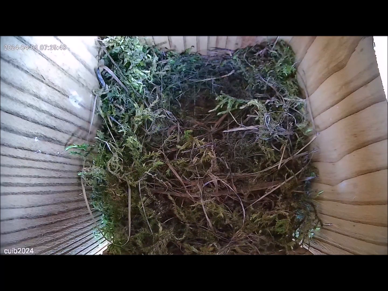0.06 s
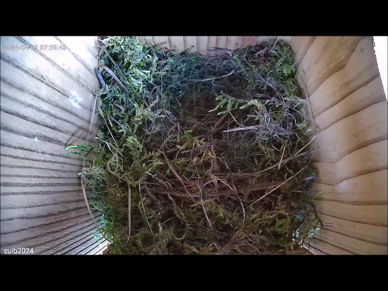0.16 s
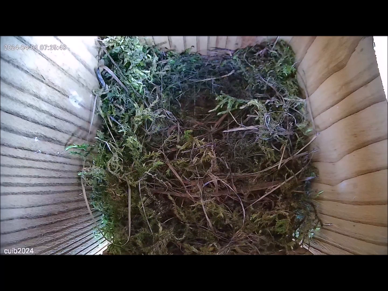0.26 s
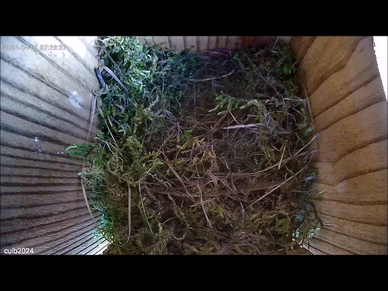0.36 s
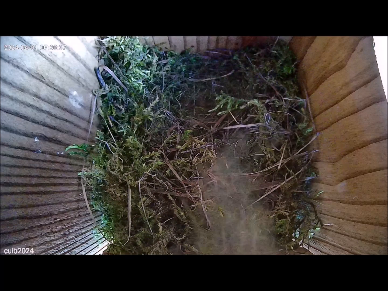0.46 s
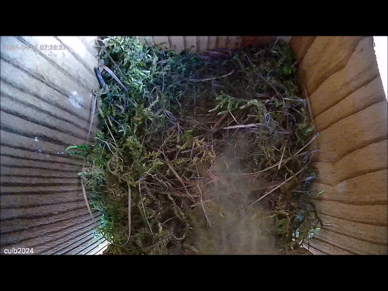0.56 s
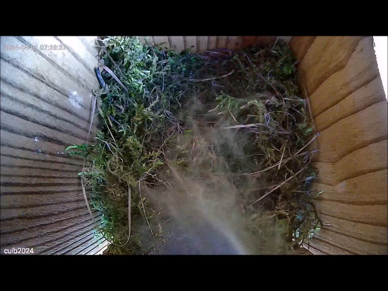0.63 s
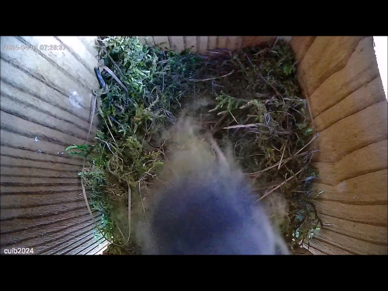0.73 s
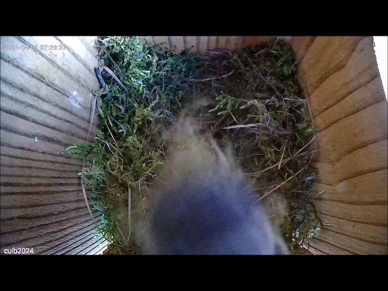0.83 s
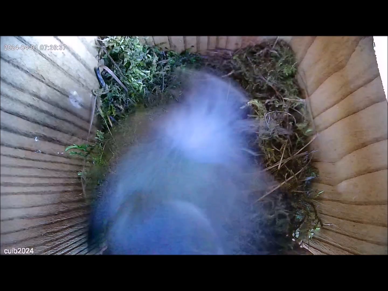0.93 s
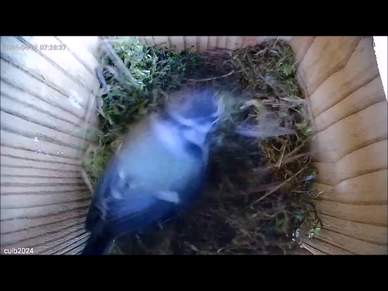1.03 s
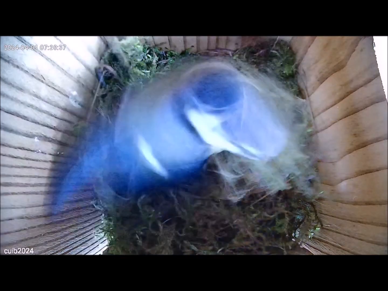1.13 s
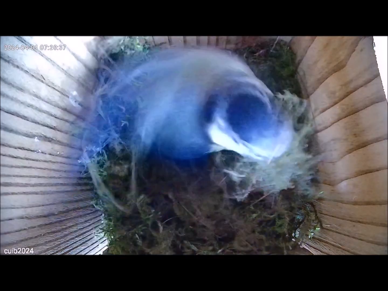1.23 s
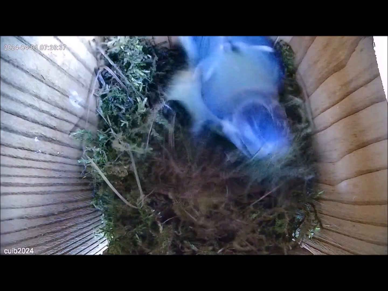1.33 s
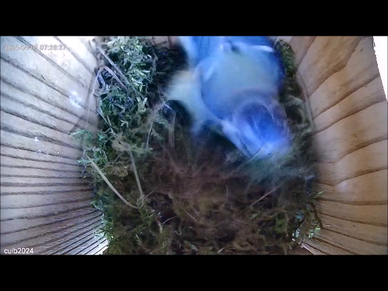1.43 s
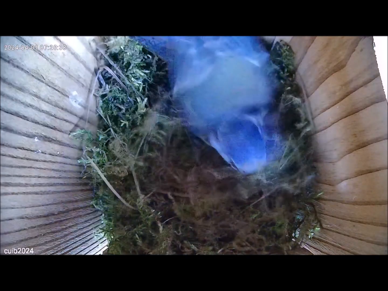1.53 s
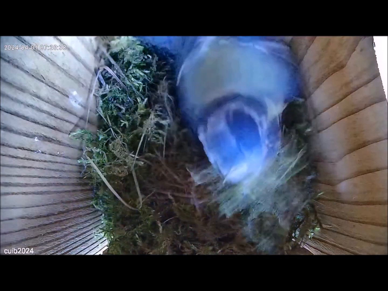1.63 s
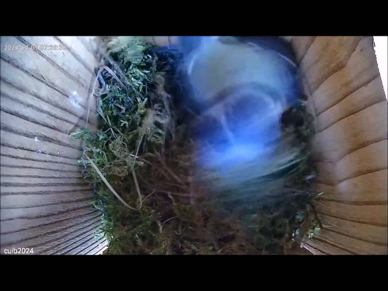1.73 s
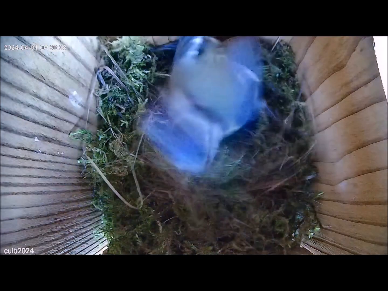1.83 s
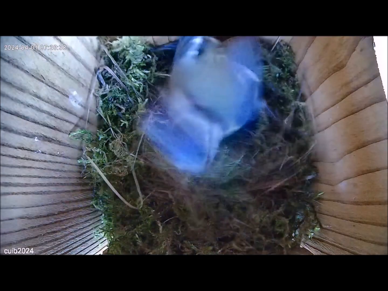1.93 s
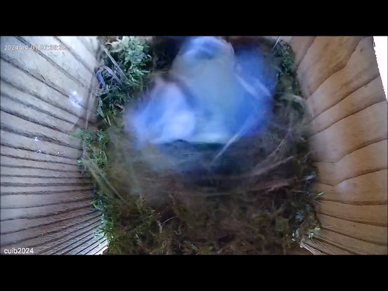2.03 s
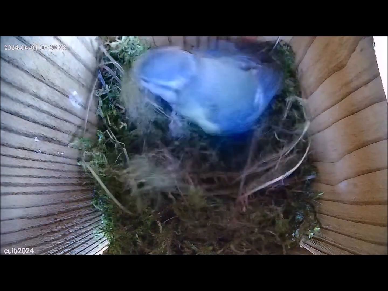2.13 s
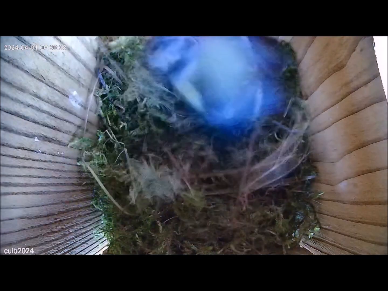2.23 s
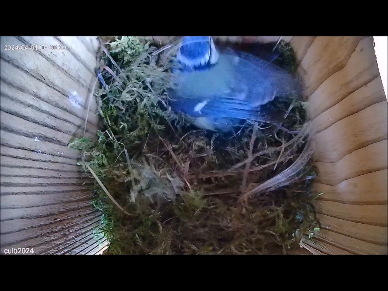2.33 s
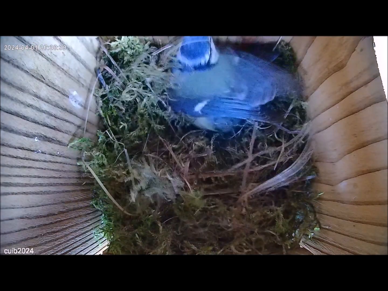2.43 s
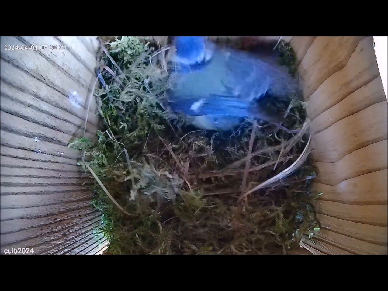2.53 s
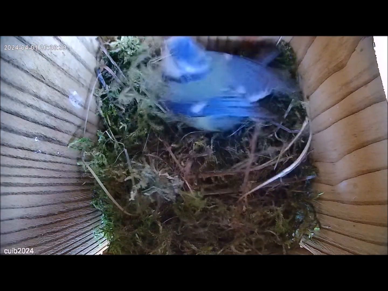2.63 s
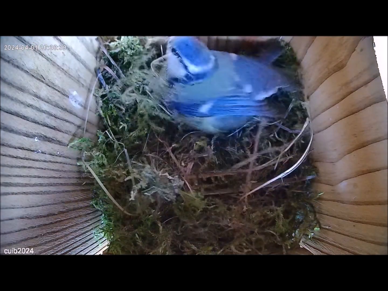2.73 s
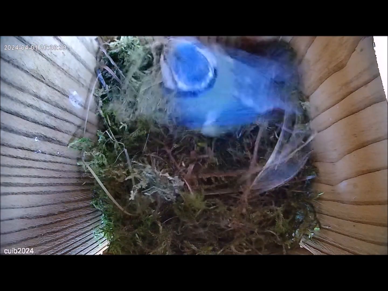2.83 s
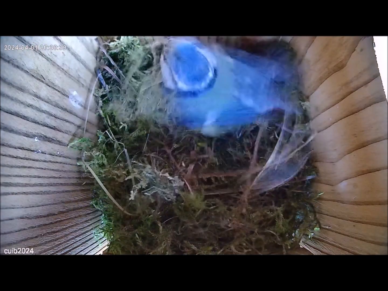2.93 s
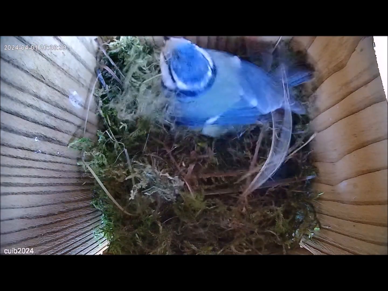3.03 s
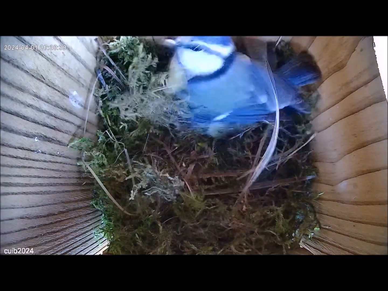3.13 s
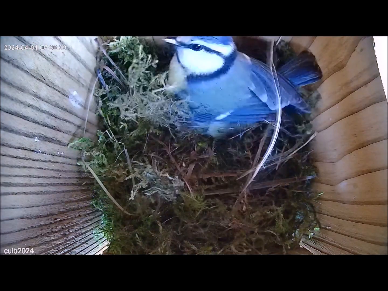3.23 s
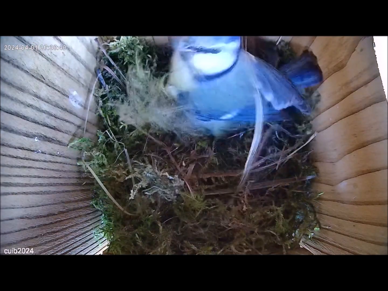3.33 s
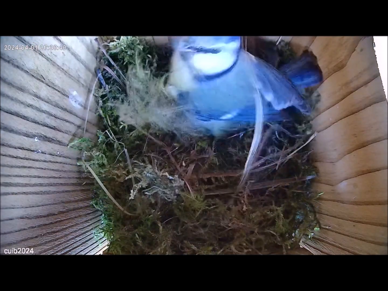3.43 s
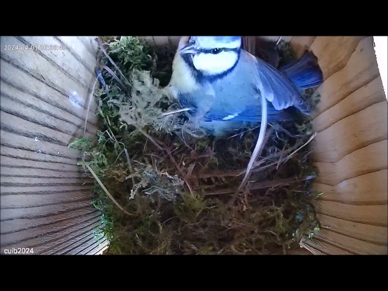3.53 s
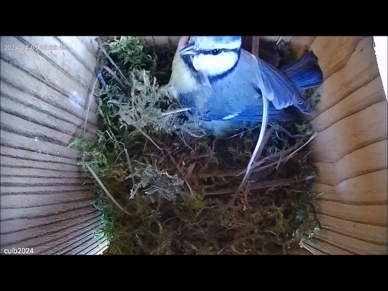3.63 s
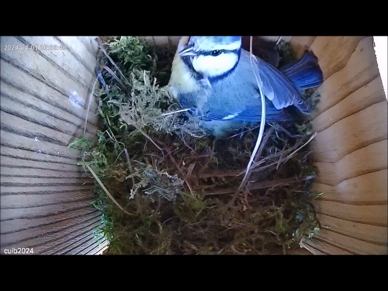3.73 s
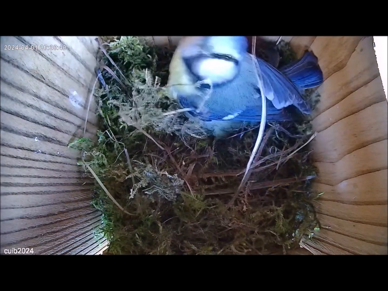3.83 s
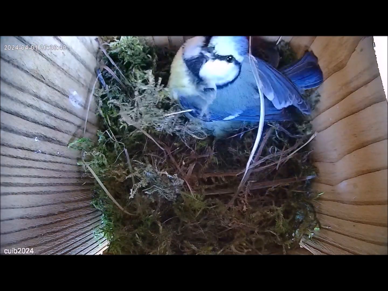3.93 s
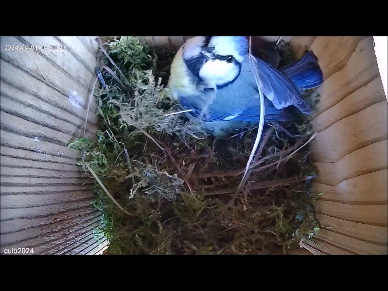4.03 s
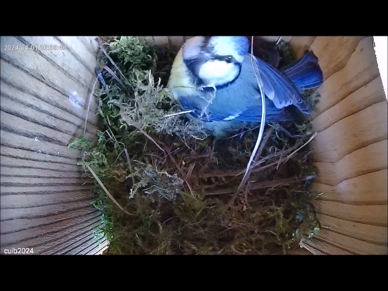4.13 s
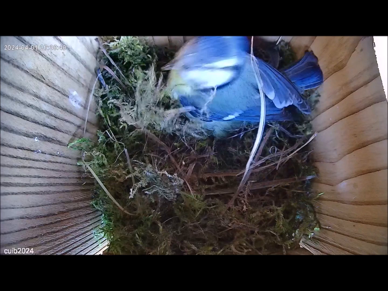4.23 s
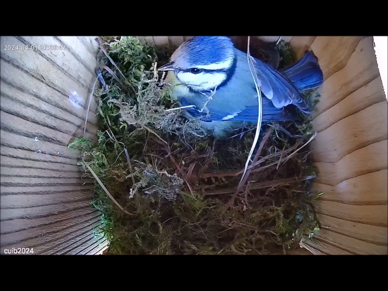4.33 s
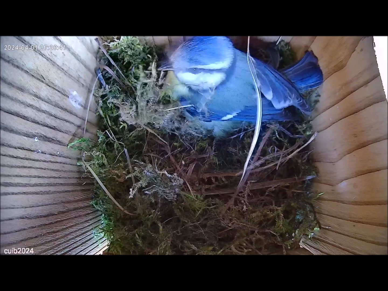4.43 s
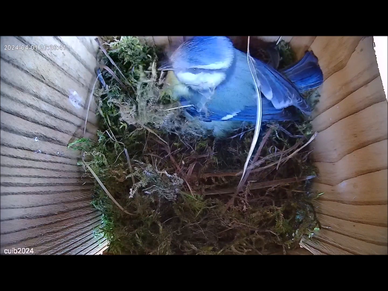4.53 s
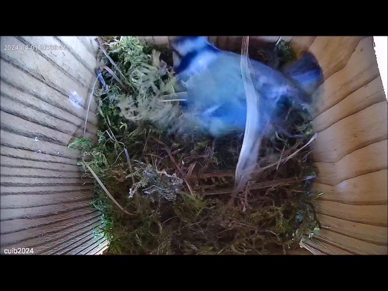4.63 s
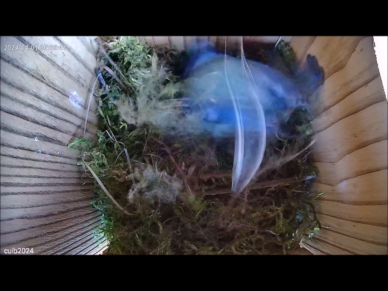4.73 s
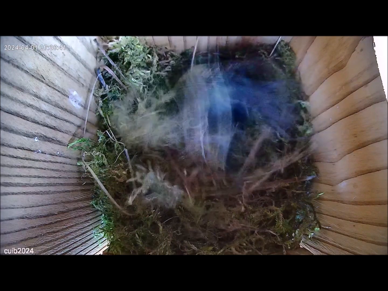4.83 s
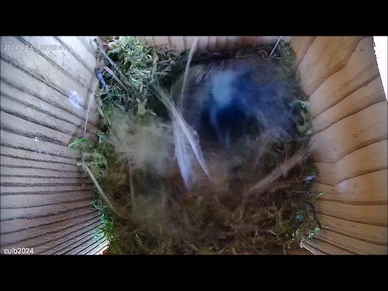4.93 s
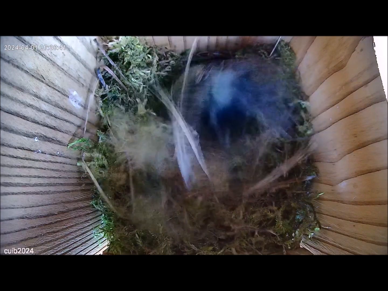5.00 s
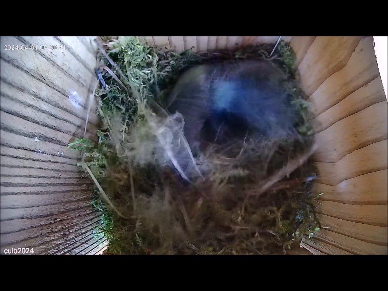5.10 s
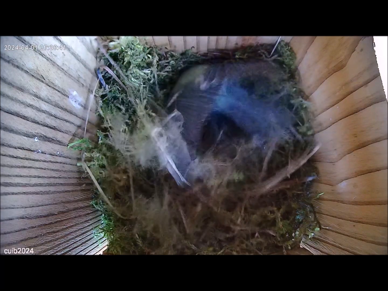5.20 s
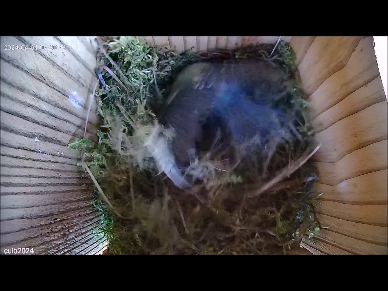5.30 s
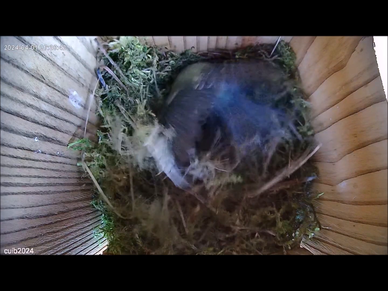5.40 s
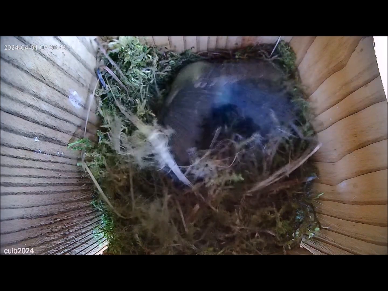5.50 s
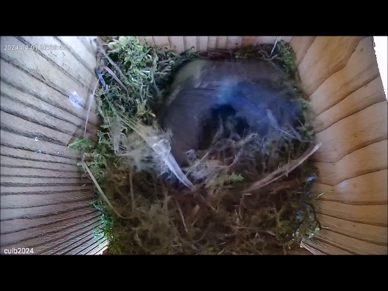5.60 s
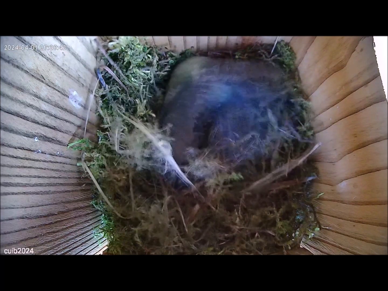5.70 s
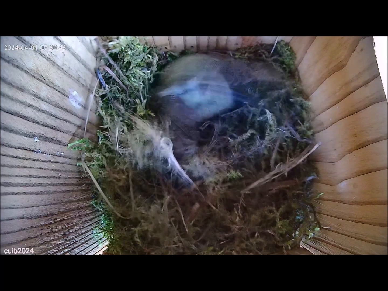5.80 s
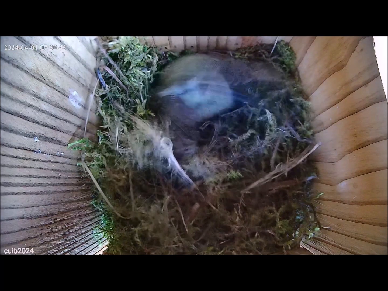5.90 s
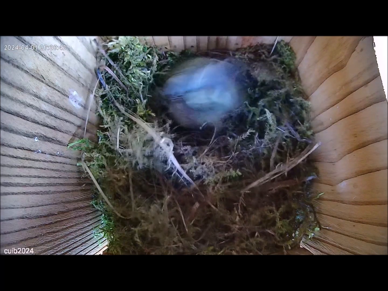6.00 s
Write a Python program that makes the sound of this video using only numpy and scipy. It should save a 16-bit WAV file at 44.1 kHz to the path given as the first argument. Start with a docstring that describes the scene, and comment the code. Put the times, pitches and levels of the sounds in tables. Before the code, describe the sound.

A small bird drops into a wooden nestbox with hard knocks, rustles scratchily through moss, pauses while faint birds call outside, then kicks the nest around noisily.

```python
"""A small bird drops into a wooden nestbox, turns in the moss, sits still, then kicks the nest cup round.
Fibres crackle and claws tap, which rings the air in the box; weight and bumps thump its boards.
Far birds call outside, a whistled hoot, two hoarse calls and a thin cry made of narrow noise.
Behind them lies soft noise of traffic and leaves, and early on the sound drops out once, briefly."""
import sys
import numpy as np
from scipy import signal
from scipy.fft import rfft, irfft, next_fast_len
from scipy.io import wavfile
from scipy.ndimage import uniform_filter1d, map_coordinates

SR = 44100
rng = np.random.default_rng(int(sys.argv[2]) if len(sys.argv) > 2 else 0)


def materialize(psi):
    """Save the field psi as 16-bit PCM at rate SR to the path in sys.argv[1].

    A 1-D psi becomes a single channel; in a 2-D psi each row is a channel.
    """
    bounded = np.clip(np.atleast_2d(psi).T, -1, 1)
    quanta = np.round(bounded * 32767).astype(np.int16)
    wavfile.write(sys.argv[1], SR, quanta)


N = 267246

# Ways the air in the box rings: two lowest (tall and cross), then the higher ones.
# Each row: pitch in Hz, width in Hz, level in dB within its list. Neighbours push in opposite directions.
TALL_AIR = [(743, 34.6, 0.0049)]
CROSS_AIR = [(1300.5, 73, -16), (1549, 59, -5.5)]
UPPER_AIR = [(2092, 94, 11), (2602, 180, 2), (3157, 140, 4.5), (3419, 54, 3), (3808, 140, 0.5),
             (4370, 80, 2.5), (4670, 180, 1.5), (5620, 131, 0.5), (6240, 260, -5), (7020, 200, 0)]


def amp(db):
    """Turn dB into a plain multiplier."""
    return 10 ** (np.asarray(db) / 20)


def unit(x):
    """Scale to an rms of 1."""
    return x / np.sqrt(np.mean(x ** 2) + 1e-20)


def curves(rows, **edge):
    """Draw one line over time for each column after the time."""
    times, *columns = np.transpose(rows)
    return [np.interp(np.arange(N) / SR, times, column, **edge) for column in columns]


def wobble(rate):
    """A smooth random curve with `rate` random points a second."""
    points = rng.standard_normal(int(N * rate / SR) + 4)
    return map_coordinates(points, [np.arange(N) * rate / SR])


def filtered(x, response):
    """Multiply the spectrum of x by a response that depends on frequency."""
    size = next_fast_len(N + SR // 2)
    spectrum = rfft(x, size) * response(np.fft.rfftfreq(size, 1 / SR))
    return irfft(spectrum, size)[..., :N]


def resonance(modes, f):
    """Each mode answers most strongly at its own pitch; signs alternate along the list."""
    total = 0
    for k, (centre, width, db) in enumerate(modes):
        peak = 1j * f * width / (centre * centre - f * f + 1j * f * width)
        total = total + (-1) ** k * amp(db) * peak
    return total


def noise_gain(modes):
    """The rms that white noise of rms 1 has after these modes."""
    response = resonance(modes, np.linspace(0, SR / 2, 8000))
    return np.sqrt(np.mean(abs(response) ** 2))


def ring(x, modes):
    """Let x ring the modes, scaled so that white noise keeps its rms."""
    return filtered(x, lambda f: resonance(modes, f)) / noise_gain(modes)


def crackle(spread_db, clump_db, patchy_db):
    """Fibres slip and snap: dense uneven impulses in clumps, with patches of changing colour."""
    unevenness = spread_db * np.minimum(rng.exponential(size=N), 4)
    clumps = clump_db * np.clip(wobble(70), -3, 1.6)
    snaps = rng.standard_normal(N) * amp(unevenness + clumps)
    z = signal.stft(snaps, nperseg=256)[2]
    patches = uniform_filter1d(rng.standard_normal(z.shape), 4, 0)  # smooth over pitch
    patches = uniform_filter1d(patches, 9, 1)  # smooth over time
    return unit(signal.istft(z * amp(patchy_db * unit(patches)), nperseg=256)[1][:N])


def bird():
    """The bird's movements drive the air in the box and, through its weight, the boards."""
    rustle, weight = bout_levels()
    return fibres_in_air(rustle) + claws() + boards(weight)


def bout_levels():
    """Each bout of shuffling holds its rustle in the air and its weight on the boards."""
    # Each row: start in seconds, end in seconds, fibre hiss in dB, tall air mode in dB over the hiss,
    # cross air mode in dB over the hiss, floor board in dB, front board in dB.
    bouts = [(0.458, 0.58, -37.5, -12, -8.5, -40.5, -32.5), (0.632, 0.675, -30, -4, -7, -28.5, -23),
             (0.708, 0.728, -34, -11, -5, -30.5, -19.5), (0.737, 0.776, -31, -11, -3.5, -24, -22.5),
             (0.859, 0.945, -41.5, -5, -3, -40, -43), (0.96, 1.07, -51.5, 1.5, -5, -51, -49.5),
             (1.09, 1.246, -37.5, -6, -7.5, -49.5, -47), (1.31, 1.563, -37.5, -7, -0.5, -51.5, -56.5),
             (1.598, 1.748, -37, 2, -1, -53, -55), (1.868, 1.998, -35.5, -17, -8, -51.5, -57.5),
             (2.103, 2.133, -38, 5.5, -0.5, -40, -51), (2.153, 2.262, -33.5, -3.5, 0, -42.5, -51),
             (2.33, 2.578, -54.5, 6.5, -1, -64, -71), (2.748, 2.898, -57.5, 2.5, 8.5, -58, -52.5),
             (4.609, 5.107, -39, -4.5, -1, -34.5, -37.5), (5.127, 5.56, -41.5, 1, 2.5, -27, -37.5),
             (5.566, 5.805, -34.5, 0.5, 7, -33, -32), (5.81, 5.915, -44.5, -2, 8, -54, -48),
             (5.95, 6.06, -58.5, -6, 1, -55.5, -50)]
    air, wood = np.full((3, N), -np.inf), np.full((2, N), -np.inf)
    for start, stop, db, tall_db, cross_db, *board_db in bouts:
        air_db = db + np.array([[0], [tall_db], [cross_db]])
        air = np.maximum(air, air_db + held(start, stop, rise_db_per_s=393, fall_db_per_s=358.5))
        # weight comes on the boards fast and leaves slowly
        pressed = held(start, stop, rise_db_per_s=498, fall_db_per_s=148)
        wood = np.maximum(wood, np.array(board_db)[:, None] + pressed)
    return amp(air), amp(wood)


def held(start, stop, rise_db_per_s, fall_db_per_s):
    """0 dB from start to stop, with steady ramps in dB either side."""
    t = np.arange(N) / SR
    return -rise_db_per_s * np.clip(start - t, 0, 1) - fall_db_per_s * np.clip(t - stop, 0, 1)


def scrape_levels():
    """Each stroke swells and fades; where it happens sets how it drives the two lowest air modes."""
    # Strokes of feet and feathers. Each row: time of the top in seconds, hiss in dB,
    # tall air mode in dB over the hiss, cross air mode in dB over the hiss, swell in seconds.
    strokes = [(0.459, -37.5, -20, 7, 0.0028), (0.487, -31.5, -9, 0.5, 0.0024),
               (0.512, -27, -37, -26, 0.0023), (0.594, -32, -10, -1, 0.01),
               (0.625, -27.5, -9.5, 7.5, 0.0038), (0.653, -28.5, -7, -8.5, 0.0027),
               (0.704, -26.5, 2.5, -2, 0.0014), (0.797, -28.5, -5, -3.5, 0.0048),
               (0.911, -37.5, 3, -5, 0.022), (1.217, -33, -0.5, 7, 0.0096), (1.362, -27.5, -9, -3.5, 0.014),
               (1.418, -26, -11.5, -13, 0.013), (1.508, -25, -12.5, 1, 0.0021),
               (1.604, -22, -8, -6.5, 0.018), (1.663, -21.5, -8, -2.5, 0.017), (1.839, -26, -1, 0, 0.0023),
               (1.913, -33, 4.5, -9, 0.028), (1.99, -26.5, -0.5, 2, 0.02), (2.155, -27.5, 7, 3, 0.0058),
               (2.216, -35, 1, 3.5, 0.013), (2.244, -32.5, -5, -3, 0.01), (2.32, -40, -8, -9, 0.012),
               (2.559, -71, 26, -12, 0.026), (2.851, -36, 6.5, 7, 0.023), (4.559, -42, 0.5, 6, 0.0051),
               (4.726, -26.5, 0, -1, 0.051), (4.801, -30, 3.5, -4, 0.027), (4.854, -29.5, -11, -8, 0.0051),
               (4.956, -28.5, -3.5, -2.5, 0.034), (5.002, -25, 8.5, 0, 0.013),
               (5.074, -31.5, -1.5, 0.5, 0.049), (5.149, -30.5, 5.5, 7.5, 0.019),
               (5.208, -29, -7, 5.5, 0.006), (5.235, -26.5, -10.5, -8, 0.027),
               (5.307, -29.5, -5, 4.5, 0.039), (5.396, -26, -18, -4, 0.04),
               (5.482, -24.5, -6.5, -0.5, 0.028), (5.56, -22.5, -3.5, 0, 0.016),
               (5.655, -33.5, 7.5, 8, 0.014), (5.694, -37, -4.5, -2, 0.038), (5.748, -33, 13, 19, 0.01)]
    fade_s = 0.0094  # every stroke dies alike
    levels, t = np.zeros((3, N + SR)), np.arange(-SR // 4, SR // 4) / SR
    for top_s, db, tall_db, cross_db, swell_s in strokes:
        shape = amp(-7 * abs(t / np.where(t < 0, swell_s, fade_s)) ** 1.25)
        peaks = amp(db + np.array([[0], [tall_db], [cross_db]]))
        levels[:, round(top_s * SR) - SR // 4:][:, :len(t)] += peaks * shape
    return levels[:, :N]


def fibres_in_air(rustle):
    """Crackling fibres are heard straight and through the ringing air of the box."""
    hiss, tall, cross = rustle * amp(0.86 * wobble(25)) + scrape_levels()
    fibres = crackle(spread_db=3.6, clump_db=2.0, patchy_db=3.0)
    straight = amp(-8.5) * np.diff(hiss * fibres, prepend=0)  # differencing brightens it
    low_ring = ring(tall * fibres, TALL_AIR) + ring(cross * fibres, CROSS_AIR)
    return straight + wandering(hiss * fibres, UPPER_AIR) + low_ring


def wandering(x, modes):
    """The moving bird drives each higher air mode now more, now less."""
    wander_db, wander_per_s = 3.5, 18
    knots = np.arange(0, N + 256, 256)
    parts = filtered(x, lambda f: np.array([resonance([mode], f) for mode in modes]))
    total = np.zeros(N)
    for k, part in enumerate(parts):
        drift = uniform_filter1d(rng.standard_normal(len(knots)), int(SR / 256 / wander_per_s))
        gain = amp(wander_db * (np.clip(unit(drift), -3, 2) - .5))
        total += (-1) ** k * np.interp(np.arange(N), knots, gain) * part
    return total / noise_gain(modes)


def claws():
    """A tap is a hard crack through the upper air modes and a short ring at one pitch."""
    # Claw and beak taps. Each row: start in seconds, level in dB, pitch in Hz.
    taps = [(.457, -13, 2890), (0.459, -21, 1132), (.489, -9.5, 4460), (0.59, -6, 4720),
            (0.626, -9.5, 3160), (.796, -1.5, 4340), (1.987, -10.5, 3420), (2.004, -11.5, 3560),
            (2.202, -16.5, 3340), (2.358, -18.5, 750), (2.526, -37, 3400), (2.676, -41, 4650),
            (2.75, -38.5, 2930), (2.767, -28, 1535), (2.841, -24.5, 729), (3.282, -24.5, 4700),
            (3.296, -35.5, 703), (3.302, -37, 1670), (4.667, -13.5, 773), (4.801, -11.5, 791),
            (5.392, -10, 760), (5.624, -10.5, 1537), (5.645, -2.5, 1552), (5.763, -4.5, 1570)]
    tones, cracks, t = np.zeros(N + SR), np.zeros(N + SR), np.arange(SR // 10) / SR
    for start, db, hz in taps:
        here = slice(round(start * SR), round(start * SR) + len(t))
        jitter = np.cumsum(rng.standard_normal(len(t))) * hz * 2e-5
        fade = amp(-60 * t / (0.01 + 40 / hz))  # low pitches ring longer
        tones[here] += amp(db) * np.sin(2 * np.pi * hz * t + jitter) * fade * (1 - np.exp(-t / 0.0015))
        burst = amp(db - 12.0 - 60 * t / 0.028) * (1 - np.exp(-t / 0.00075))
        cracks[here] += burst * hz / 4000 * rng.standard_normal(len(t))  # higher taps crack harder
    return tones[:N] + ring(cracks[:N], UPPER_AIR)


def boards(weight):
    """Shifting weight crackles on the wood and bumps push it, so floor and front boards ring."""
    # Body and feet bump the boards. Each row: start in seconds, level in dB, share on the front board (0-1).
    bumps = [(0.456, -29, 0.7), (0.491, -23.5, 0.87), (0.586, -23.5, 0.64), (0.625, -20.5, 1),
             (0.703, -15.5, 0.9), (0.7123, -15, 0.85), (0.723, -17.5, 1), (0.793, -16.5, 0.8),
             (1.713, -48, 0), (2.144, -41.5, 0.07), (2.264, -46, 0.4), (2.849, -38, 0.24),
             (4.565, -34.5, 0.84), (4.743, -25.5, 0.72), (4.99, -21, 0.7), (5.129, -23, 0.38),
             (5.204, -28, 0.5), (5.265, -25, 0.54), (5.372, -31, 0.76), (5.454, -23, 0), (5.498, -24.5, 0),
             (5.562, -28, 0.3), (5.629, -20.5, 0.53), (5.744, -32, 0.67)]
    # How each board rings. Each row: pitch in Hz, width in Hz, level in dB within its list.
    floor_modes = [(72.4, 98, -15.5), (130.3, 16, 3), (212.7, 17, -2)]
    front_modes = [(215.5, 15, -6.5), (296, 18.5, 1.5), (1176, 15, -17), (465.8, 16, -15.5)]
    floor, front = weight * crackle(spread_db=0.5, clump_db=4.0, patchy_db=4.0)
    push = np.hanning(90)  # a soft contact is a push of about 2 ms
    for start, db, front_share in bumps:
        here = slice(round(start * SR), round(start * SR) + len(push))
        floor[here] += amp(db) * (1 - front_share) * push
        front[here] += amp(db) * front_share * push
    return ring(floor, floor_modes) + ring(front, front_modes)


def far_birds():
    """Birds outside: hoarse calls, a thin cry and a hoot."""
    # Far hoot. Each row: time in seconds, pitch in Hz, level in dB.
    hoot_line = [(3.703, 693, -62.5), (3.715, 675, -45.5), (3.79, 665, -42.5), (3.815, 693, -59),
                 (3.84, 635, -44), (3.89, 624, -55)]
    return far_caws() + far_cry() + tone(hoot_line, [0, -21, -19], rough=0.02, flutter_db=3.0)


def far_caws():
    """The air modes of the box pick out parts of each hoarse glide."""
    # Each row: start in seconds, level in dB.
    caw_starts = [(3.4, -38.5), (4.202, -34)]
    calls = sum(hoarse(start, db) for start, db in caw_starts)
    return filtered(calls, lambda f: 0.75 + 3.7 * abs(resonance(TALL_AIR + CROSS_AIR, f)))


def hoarse(start, level_db):
    """Breathy voice pulses in a broad throat band that glides with the call."""
    # One call rises, breaks and sounds again.
    # Each row: seconds after its start, centre of the band in Hz, dB relative to the call's level.
    glide = [(0, 755, -24), (.03, 930, 2), (.055, 1050, 3), (.085, 1640, -10), (.135, 1500, 4.5),
             (.19, 1495, -34.5)]
    pitch_hz, breath, hollow = 255, .9, .8  # breath is noise level; hollow is how far even partials cancel
    rows = np.add(glide, [start, 0, level_db])
    cycles = np.cumsum(pitch_hz * (1 + 0.013 * wobble(40))) / SR
    pulses = np.diff(np.floor(cycles), prepend=0)
    pulses = pulses - hollow * np.roll(pulses, round(SR / pitch_hz / 2))  # half a period later
    hz, t, z = signal.stft(unit(pulses) + breath * rng.standard_normal(N), SR, nperseg=512)
    centre = np.interp(t, rows[:, 0], rows[:, 1])
    band = np.exp(-(np.log((hz[:, None] + 1) / centre) / 0.27) ** 2)
    voice = signal.istft(z * band, SR, nperseg=512)[1][:N]
    return amp(curves(rows, left=-120, right=-120)[1]) * voice


def far_cry():
    """Two narrow bands of noise about an octave apart; the lower sits on a cross air mode."""
    # Each row: time in seconds, lower band in dB, upper band in dB.
    cry_levels = [(3.9, -74, -88), (3.98, -52, -88), (4.13, -59, -78), (4.165, -47, -49),
                  (4.26, -37.5, -54), (4.3, -46, -66), (4.34, -36.5, -69), (4.44, -54, -64),
                  (4.52, -68, -63)]
    low_db, high_db = curves(cry_levels, left=-120, right=-120)
    low = ring(ring(rng.standard_normal(N), [(1546, 23, 0)]), [(1506, 63, 0)])
    high = ring(rng.standard_normal(N), [(3210, 93, -17.5), (3330, 61, -20.5)])
    high = ring(high, [(3060, 450, 0)])
    return amp(low_db) * unit(low) + amp(high_db) * unit(high)


def tone(rows, overtones_db, rough, flutter_db):
    """A whistled line with weak overtones, unsteady in pitch and strength."""
    hz = curves(rows)[0]
    db = curves(rows, left=-120, right=-120)[1]
    phase = 2 * np.pi * np.cumsum(hz * (1 + rough * wobble(200))) / SR
    whistle = sum(amp(g) * np.sin((k + 1) * phase) for k, g in enumerate(overtones_db))
    return amp(db + flutter_db * wobble(60)) * whistle


def garden():
    """Far noise of traffic and leaves, coloured by the air modes on its way in."""
    # Each row: frequency in Hz, relative strength of the noise there in dB.
    noise_colour = [(15, -91.5), (25, -34), (267, -1.5), (373, -19.5), (441, -22), (602, -29),
                    (6910, -30.5), (7600, -34.5), (9880, -74), (16700, -120)]
    f, db = np.transpose(noise_colour)

    def inside(hz):
        low_ring = abs(resonance(TALL_AIR + CROSS_AIR, hz))
        return 1 + 3.7 * low_ring + 0.13 * abs(resonance(UPPER_AIR, hz))

    def colour(hz):
        return amp(np.interp(np.log(hz + 1), np.log(f + 1), db)) * inside(hz)

    rustling = crackle(spread_db=-1.5, clump_db=0.55, patchy_db=3.0)
    return unit(filtered(rustling, colour)) * amp(-53 + 0.51 * wobble(2.3))


def scene():
    """The bird in the box, the far birds and the garden together, as one channel."""
    return (bird() + far_birds() + garden())[None]


def record(dry):
    """The sound drops out once, and the treble is cut off steeply."""
    # The silent gap: start in seconds, end in seconds.
    gap = (.284, .4225)
    top_hz = 7260
    t = np.arange(N) / SR
    live = dry * ((t < gap[0]) | (t > gap[1]))
    return filtered(live, lambda hz: 1 / (1 + (hz / top_hz) ** 90))


dry = scene()
out = record(dry)
materialize(out)
```